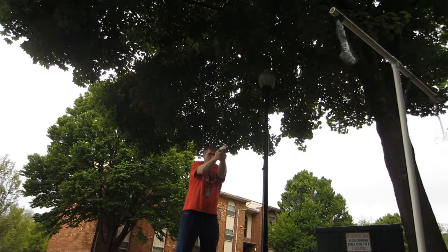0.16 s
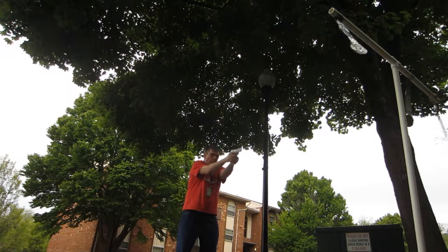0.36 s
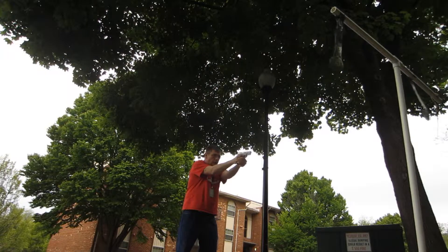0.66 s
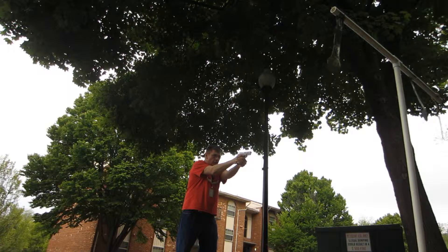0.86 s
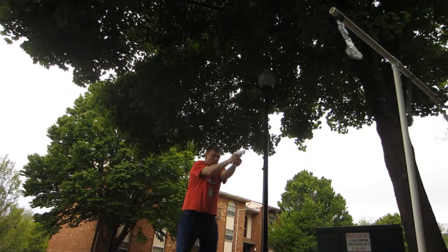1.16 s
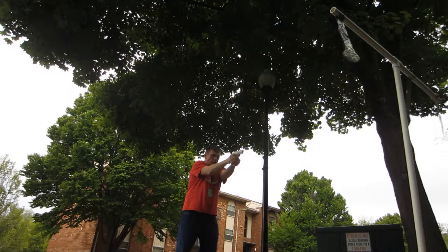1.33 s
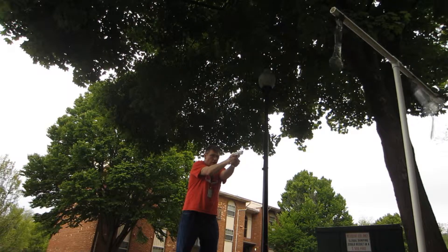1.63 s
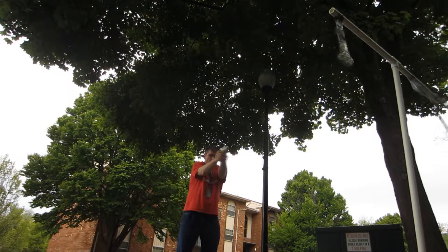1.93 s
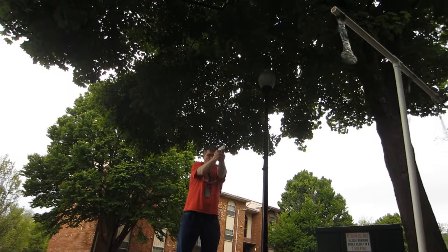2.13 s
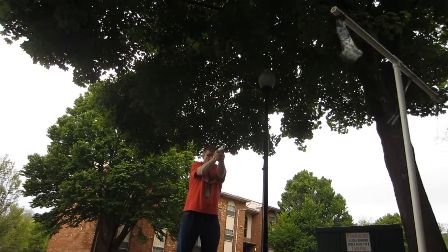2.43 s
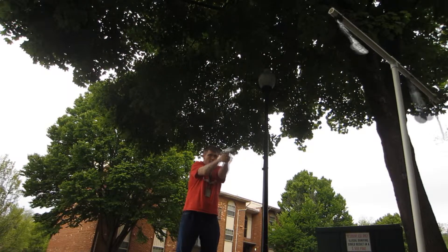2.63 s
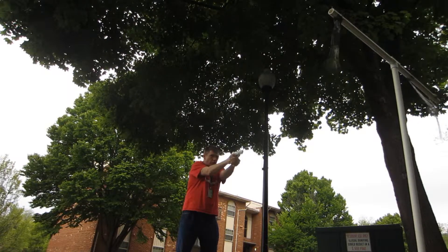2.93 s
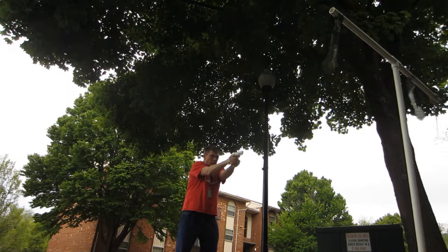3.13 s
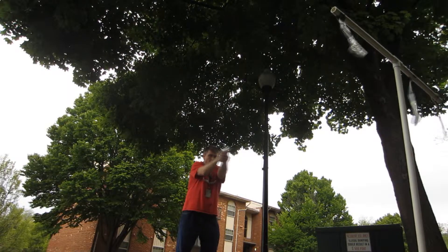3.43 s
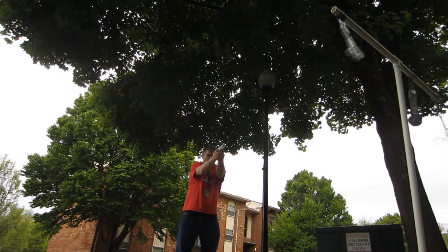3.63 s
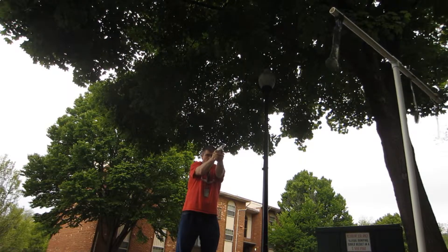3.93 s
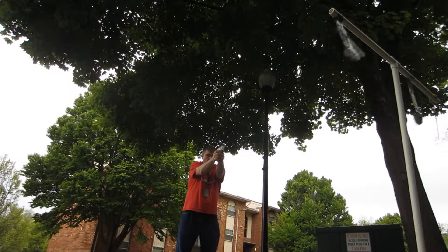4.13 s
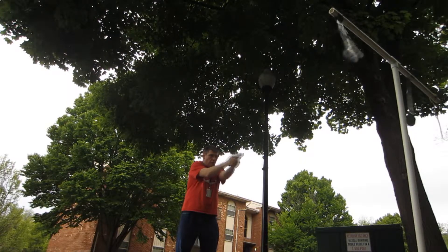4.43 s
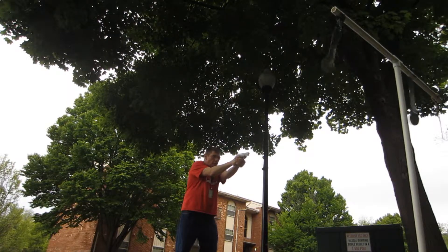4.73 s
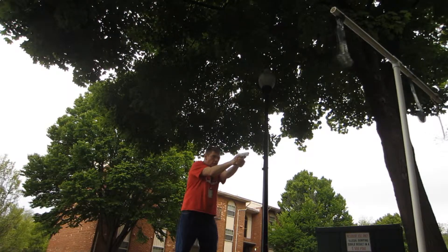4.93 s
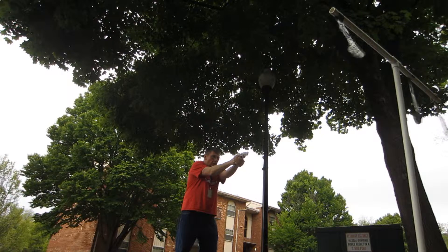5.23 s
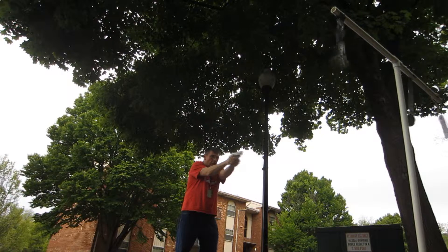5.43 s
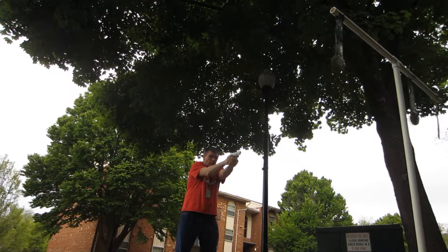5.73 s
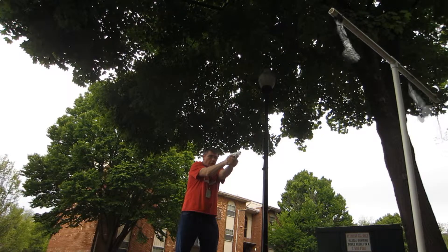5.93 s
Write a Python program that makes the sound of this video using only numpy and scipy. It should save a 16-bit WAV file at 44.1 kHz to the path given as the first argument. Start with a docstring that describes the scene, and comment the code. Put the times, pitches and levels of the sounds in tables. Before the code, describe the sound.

Close, dry, slightly clipped shots and metal hits, nearly a double snap each time, come roughly once a second. Plates ring briefly in differing pitches; the second and seventh hits rattle chain links more softly. Spent pellets click nearby, one rattling hard after the seventh shot. Distant tyre rush continues quietly, with a faint engine drone and hoarse bird chirps near the end. Trees and house fronts return a light echo.

```python
"""In a yard between houses a gas pistol is fired eight times at small metal targets near the microphone.
Each muzzle pop is a few short decaying tones and noise that arrive by several paths, then the pellet hits:
a crack and ringing metal, and on the chain clattering links. Spent pellets tick and rattle as short clicks.
Noise and an engine's tones make the traffic, and a bird chirps far off with falling tones. The yard echoes.
The recorder turns its gain down after each bang and clips the hardest hits."""
import sys
import numpy as np
from scipy import signal
from scipy.io import wavfile
from scipy.ndimage import uniform_filter1d, map_coordinates

SR = 44100
rng = np.random.default_rng(int(sys.argv[2]) if len(sys.argv) > 2 else 0)


def transcribe(signal):
    """Save signal, clipped to [-1, 1], as a 16-bit WAV file at the path in sys.argv[1]."""
    frames = np.atleast_2d(signal).T
    limited = np.clip(frames, -1, 1)
    pcm = np.round(limited * 32767).astype(np.int16)
    wavfile.write(sys.argv[1], SR, pcm)


N = 268128

# ways in which the chain can ring: (pitch_hz, level_db, t60_s)
CHAIN_MODES = [(1620, -19.5, 0.75), (2720, -20, .4), (3138.5, -6.5, 0.59), (3426, -18, .4),
               (3865, -15, 0.64), (4210, -14, 0.96), (4285, -6.5, .3), (4993, -2, 0.24), (5540, -8.5, 0.54),
               (5650, -6.5, .3), (6325, -9.5, 0.54), (7040, -9.5, .6), (7270, -7.5, 0.31),
               (7720, -12.5, 0.3), (7890, -17.5, .35), (8570, -12.5, 0.43), (8780, -11, 0.37),
               (9350, -4, 0.27), (9470, -9.5, .25), (9730, -10.5, 0.2), (10345, -24, .2),
               (11150, -26, 0.089), (13480, -25, 0.2), (13800, -11, 0.218), (14860, -15, 0.2),
               (15300, -11, .2)]
# a swinging target rubs its hook and damps fast, a fainter part lingers: (share of t60, lingering_db)
PLATE_DAMPING, CHAIN_DAMPING = (0.4, -13.5), (0.18, -13)


def amp(db):
    """Turn decibels into a gain."""
    return 10 ** (np.asarray(db) / 20)


def rms_one(x):
    """Scale to an rms (average strength) of 1."""
    return x / np.sqrt(np.mean(x ** 2) + 1e-30)


def at_hz(points, hz, column=1):
    """Read a table between its rows, on a log-frequency axis."""
    table = np.array(points)
    return np.interp(np.log(hz), np.log(table[:, 0]), table[:, column])


def pan(x, db):
    """Give a sound a left-right level difference; above 0 dB the left is louder."""
    return x * amp([[db / 2], [-db / 2]])


def add(out, sound, s):
    """Mix a stereo sound in at s seconds."""
    i = round(s * SR)
    out[:, i:i + sound.shape[1]] += sound[:, :N - i]


def dying(length, t60):
    """Exponential decay that falls by 60 dB in t60 seconds."""
    return np.exp(-np.log(1000) * np.arange(round(length * SR)) / SR / t60)


def ringing(modes, gains_db, length):
    """A struck thing sounds as a sum of decaying sines."""
    t = np.arange(round(length * SR)) / SR
    return sum(amp(db + gain_db) * dying(length, t60) * np.sin(2 * np.pi * hz * t)
               for (hz, db, t60), gain_db in zip(modes, gains_db))


def favour(modes, *pitches):
    """Extra dB for the modes near the favoured pitches, given as Hz and dB in turn."""
    mode_hz = np.array(modes)[:, 0]
    return sum(db * np.exp(-(np.log2(mode_hz / hz) / 0.12) ** 2)
               for hz, db in zip(pitches[::2], pitches[1::2]))


def bands(size):
    """Half-octave bands of mid and side noise with their centres in Hz."""
    edges_hz = 22 * 2 ** np.arange(0, 10, .5)
    white = rng.standard_normal((2, 2, size))
    for k, (low, high) in enumerate(zip(edges_hz, edges_hz[1:])):
        band = signal.butter(2, [low, high], "band", fs=SR, output="sos")
        yield np.sqrt(low * high), signal.sosfilt(band, white[k % 2])   # neighbours use different noise


def stereo(mid, side, alike):
    """Two channels of the given likeness: 0 is unrelated, 1 is the same."""
    alike = np.clip(alike, 0, 1)
    return np.sqrt(1 + alike) * mid + np.sqrt(1 - alike) * side * [[1], [-1]]


def drift(rate):
    """Slow random wander, with rate new values a second of spread 1."""
    knots = rng.standard_normal(400)
    return np.interp(np.arange(N) / SR * rate, np.arange(400), knots)


def flicker(size):
    """A turning target aims each mode now at the microphone, now past it: a gain that wavers at random."""
    spread_db, turns_per_s = 4, 35
    steps = np.arange(size) / SR * turns_per_s
    return amp(spread_db * np.interp(steps, np.arange(100), rng.standard_normal(100)))


def tyre_rush():
    """Far tyres make a patchy rush: noise bands that wander in level, together and each alone."""
    # colour of the rush: (band_hz, level_db per Hz)
    rush_colour = [(12, -55), (20, -29), (65, -4), (205, -7), (360, -8.5), (961, -11.5), (1780, -29),
                   (2490, -38), (5030, -43.5), (5470, -35), (5950, -49.5), (7660, -41.5), (12000, -68.5),
                   (15000, -53.5), (16400, -67)]
    # how alike left and right are: (band_hz, likeness 0 to 1)
    rush_likeness = [(60, 0.56), (180, 0.8), (550, 0.8), (1650, 0.71), (4970, 0.11), (15000, 0.083)]
    # loudness of the rush over time: (time_s, level_db)
    rush_level = [(0, -49), (1, -49), (2, -46), (3, -48), (4, -50), (4.8, -48.5), (5.4, -46.5),
                  (6.08, -47.5)]
    together = drift(3.6)
    rush = 0
    for hz, noise in bands(N):
        band_db = at_hz(rush_colour, hz) + 1.0 * together + 1.1 * drift(15)
        rush = rush + amp(band_db) * stereo(*noise, at_hz(rush_likeness, hz))
    level_db = np.interp(np.arange(N) / SR, *np.transpose(rush_level))
    return amp(level_db) * rms_one(rush)


def engine():
    """An engine draws near, then holds; its three related tones step up in pitch as it pulls."""
    near_s, near_db, approach_db_per_s = 5.2, -52, 12
    start_hz, pull_hz, pull_s = 200.4, 12, 0.284   # the step up ends at near_s
    t = np.arange(N) / SR
    hz = start_hz + pull_hz * np.clip((t - near_s) / pull_s + 1, 0, 1)
    level_db = near_db + approach_db_per_s * np.minimum(t - near_s, 0)
    turns = 2 * np.pi * np.cumsum(hz * (1 + 0.0088 * drift(28))) / SR
    drone = sum(amp(db + 3 * drift(15)) * np.sin(order * turns) for order, db in [(.5, -5), (1, 0), (1.5, -5)])
    return amp(level_db) * drone


def faint_hiss():
    """Band-filtered noise near 3 kHz swells with the bird's later calls and fades."""
    quiet_db, swell_s, rise_s, top_db, fade_db_per_s = -85.5, 5.04, 0.21, -59.5, 13.5
    t = np.arange(N) / SR
    level_db = quiet_db + (top_db - quiet_db) * np.clip((t - swell_s) / rise_s, 0, 1)
    level_db -= fade_db_per_s * np.maximum(t - swell_s - rise_s, 0)
    band = signal.butter(2, [2500, 3500], "band", fs=SR, output="sos")
    return amp(level_db) * rms_one(signal.sosfilt(band, rng.standard_normal(N)))


def traffic():
    """The rush of far tyres, the engine's drone and the faint hiss, a little to the right."""
    return pan(tyre_rush() + engine() + faint_hiss(), -.6)


def bird():
    """Short chirps: a sine that falls in pitch, made hoarse by random pitch jumps."""
    # calls of the far bird: (start_s, length_s, end_pitch_hz, level_db)
    chirps = [(0.908, 0.038, 2750, -82), (5.094, .05, 2650, -60), (5.183, 0.035, 3200, -65),
              (5.645, 0.05, 2570, -58), (5.789, 0.0544, 2580, -62.5), (5.957, 0.046, 2600, -58.5)]
    fall, roughness = 0.081, 0.28   # shares of the pitch
    out = np.zeros((2, N))
    for s, length, hz, db in chirps:
        u = np.linspace(-1, 1, round(length * SR))
        pitch = hz * (1 + fall * ((1 - u) / 2) ** 2 + roughness * rng.standard_normal(len(u)))
        chirp = (1 - u ** 2) * np.sin(2 * np.pi * np.cumsum(pitch) / SR)
        add(out, pan(amp(db) * chirp, 0), s)
    return out


def click():
    """A sharp contact gives a short broad burst of noise."""
    band = signal.butter(2, [1400, 9500], "band", fs=SR)
    burst = signal.lfilter(*band, stereo(*rng.standard_normal((2, SR // 10)), 0.22))
    return burst * dying(.1, 0.0039)


def ticks():
    """Spent pellets and the pistol's small parts: each a sharp click and a short ring, from here or there."""
    # single ticks: (start_s, level_db, pitch_hz, ring_t60_s)
    tick_list = [(0.386, -47, 4800, .004), (0.7448, -47.5, 4880, 0.0019), (1.2802, -32.5, 2070, 0.0031),
                 (1.58, -54.5, 2100, 0.011), (1.8764, -39, 2880, 0.0044), (2.2075, -59, 5050, .003),
                 (2.253, -54, 4080, 0.0047), (2.2605, -53.5, 5810, .01), (3.046, -53, 4690, .003),
                 (3.0574, -53, 6070, .003), (3.0889, -56.5, 5740, .02), (3.11, -49, 1960, 0.013),
                 (3.9296, -55.5, 4956, 0.0028), (4.883, -59, 5400, .06), (4.9397, -50, 1790, 0.0092)]
    pan_db, pan_spread_db = -1.5, 9
    out = np.zeros((2, N))
    for s, db, hz, t60 in tick_list:
        tick = amp(db - 6.0) * click() + ringing([(hz, db, t60)], [0], .1)
        add(out, pan(tick, pan_db + pan_spread_db * rng.standard_normal()), s)
    return out


def rebound():
    """A pellet rattles on something hard by the microphone: every touch clicks and rings the same short modes."""
    # touches of the pellet: (start_s, level_db)
    touches = [(5.4212, -22), (5.4227, -23), (5.4254, -6.5), (5.4362, -14), (5.4431, -24)]
    # ringing of the hard thing: (pitch_hz, level_db, t60_s)
    hard_modes = [(2300, -21.5, 0.024), (3500, -13.5, 0.0063), (5530, -10, 0.0064), (6460, -3, 0.0046),
                  (7440, -2, 0.0055)]
    out = np.zeros((2, N))
    for s, db in touches:
        ring = ringing(hard_modes, rng.normal(0, 3.4, len(hard_modes)), .1)
        add(out, pan(amp(db) * (amp(1.5) * click() + ring), -10.0), s)
    return signal.sosfilt(signal.butter(2, 9000, fs=SR, output="sos"), out + 1e-18)


def metal(modes, gains_db, share, linger_db, wavers=True):
    """Each mode has a strong, quickly damped part and a faint lingering pair that beats, uneven left to right."""
    split_hz, beat_hz, partner_db = 7.5, 6, -7.5
    out, t = np.zeros((2, SR)), np.arange(SR) / SR
    for (hz, db, t60), gain_db in zip(modes, gains_db):
        split, turn, lean, beat = rng.standard_normal(4)
        phase = 2 * np.pi * hz * t + 0.2 * turn * np.sqrt(hz / 5000) * np.array([[1], [-1]])
        partner = np.sin(phase + 2 * np.pi * beat_hz * (1 + .4 * beat) * t)
        linger = np.sin(phase) - amp(partner_db) * partner
        strong = np.sin(phase + 2 * np.pi * split_hz * split * t)
        both = dying(1, share * t60) * strong + amp(linger_db) * dying(1, t60) * linger
        waver = flicker(SR) if wavers else 1
        out += pan(amp(db + gain_db) * both * waver, 2.5 * lean)
    return out


def clatter():
    """Quick uneven link contacts click and push in step with each mode, so the ring swells while they last."""
    # spells of clatter: (start_s, end_s, level_db, pitch_hz, favour_db, second pitch_hz, favour_db)
    spells = [(1.03, 1.066, -44, 8100, 16, 6300, 3), (1.06, 1.101, -48, 3707, 20.4, 5050, 12),
              (5.26, 5.283, -38, 3140, 7.6, 4340, 11.4), (5.275, 5.312, -46, 5400, 4.7, 7000, 3.4)]
    contacts_per_s, click_db = 830, 13   # the clicks' level is over the clatter's
    out, t = np.zeros((2, N)), np.arange(SR // 10) / SR
    band = signal.butter(2, [2500, 10000], "band", fs=SR)
    for start, end, db, *pitches in spells:
        touch = (rng.random(len(t)) < contacts_per_s / SR) * (t < end - start)
        sound = 0
        for mode, gain_db in zip(CHAIN_MODES, db + favour(CHAIN_MODES, *pitches)):
            in_step = np.cos(2 * np.pi * (mode[0] * t + rng.random()))
            pushes = touch * rng.exponential(1, len(t)) * in_step
            one_ring = metal([mode], [gain_db], *CHAIN_DAMPING, wavers=False)
            ring = signal.fftconvolve([pushes], one_ring, axes=1)
            sound = sound + ring * flicker(ring.shape[1])
        add(out, pan(sound, -6.0), start)
        noise = stereo(*rng.standard_normal((2, SR // 20)), 1.0)
        link_click = signal.lfilter(*band, noise) * dying(.05, 0.02)
        clicks = signal.fftconvolve([touch * rng.standard_normal(len(t))], link_click, axes=1)
        add(out, pan(amp(db + click_db) * clicks, 0.54), start)
    return out


def hits():
    """A pellet's hit: a sharp crack, the target's modes and a shimmer of modes too dense to tell apart."""
    # pellet hits: (start_s, target, crack_db, ring_db, shimmer_db, shimmer_tilt_db per octave,
    # then two pitches favoured by the spot that is hit: pitch_hz, favour_db, pitch_hz, favour_db)
    hit_list = [(0.1604, "left", 5, -21.5, -24, -0.62, 2937, 9, 4430, 4),
                (1.029, "chain", -20, -28.5, -20.5, .3, 5040, 2.5, 8500, 3),
                (1.6795, "right", 2.5, -21.5, -20.5, -0.54, 1500, 12.5, 6120, 5),
                (2.501, "left", -0.5, -20, -18.5, 0.38, 2090, 5.5, 3007, 6.3),
                (3.192, "right", 4, -28, -30, 1.6, 1732, 11.5, 6070, 7.3),
                (4.111, "left", 1, -21, -19, -0.77, 3410, 13, 5890, 1.9),
                (5.2497, "chain", -12, -30.5, -20.5, -0.7, 4200, 4, 9550, 3.05),
                (6.0555, "right", -0.5, -34, -27, 1.2, 4200, 8, 1500, 3)]
    # ways in which the two plates can ring: (pitch_hz, level_db, t60_s)
    left_plate = [(1670, -14, 0.2), (2090, -10, 0.38), (2237, -17.5, 0.2), (2970, -7.5, 0.15),
                  (3426, -11.5, 0.15), (3460, -10.5, 0.26), (4410, -9, 0.39), (4740, -13, 0.13),
                  (5300, -9.5, 0.27), (5740, -11.5, 0.21), (5938, -12, 0.45), (6480, -13.5, 0.21),
                  (6900, -11, 0.4), (8600, -16, 0.33), (9090, -14.5, .2), (9550, -9, .2)]
    right_plate = [(1490, -5, 0.17), (1730, -4, 0.22), (2660, -15.5, 0.25), (2914, -14, 0.73),
                   (3514, -13, 0.2), (4020, -11, 0.19), (4580, -14, .35), (5150, -12.5, 0.57),
                   (5206, -10, 0.086), (6060, -7.5, 0.5), (6560, -17.5, 0.26), (7190, -6, .22),
                   (8820, -15, 0.26), (9500, -17, .25)]
    # colour of the dense high modes: (band_hz, level_db per Hz)
    shimmer_colour = [(410, -47), (700, -14), (1350, -7.5), (1710, -6), (2800, -2.5), (3030, -2.5),
                      (3550, -9.5), (6570, -1.5), (9730, -23), (11800, -25.5), (16000, -13.5)]
    shimmer_t60_s, crack_t60_s, crack_hz = 0.2, 0.011, 4440
    out = np.zeros((2, N))
    # modes, damping and left-right place in dB
    targets = {"left": (left_plate, PLATE_DAMPING, -3), "right": (right_plate, PLATE_DAMPING, -5.3),
               "chain": (CHAIN_MODES, CHAIN_DAMPING, -2)}
    for s, target, crack_db, ring_db, shimmer_db, tilt_db, *pitches in hit_list:
        modes, damping, pan_db = targets[target]
        scatter_db = rng.normal(0, 1.5, len(modes))
        ring = metal(modes, ring_db + favour(modes, *pitches) + scatter_db, *damping)
        # the plastic pellet flattens
        snap = -ringing([(crack_hz, crack_db, .0025), (8500, crack_db - 2.4, .002)], [0, 0], 1.)
        shimmer = 0
        for hz, noise in bands(SR):
            if hz > 600:
                band_db = at_hz(shimmer_colour, hz) + tilt_db * np.log2(hz / 4000)
                shimmer = shimmer + amp(band_db) * stereo(*noise, .9 - 0.046 * hz / 1000)
        # the same noise serves the long shimmer and the short crack
        shape = amp(shimmer_db) * dying(1, shimmer_t60_s) + amp(crack_db - 7.5) * dying(1, crack_t60_s)
        add(out, pan(snap - ring + rms_one(shimmer) * shape, pan_db), s)
    return out


def pistol():
    """One pop shape, nearly the same each time, by several paths; faint noise swells in just before each pop."""
    # muzzle pops: (start_s, level_db)
    shots = [ (0.1392, -1.5), (1.0066, -2), (1.6582, -0.5), (2.4789, -0.5), (3.1691, -3), (4.0893, -2),
             (5.2274, -2), (6.033, -2)]
    # ringing of barrel and slide: (pitch_hz, level_db, t60_s)
    pistol_modes = [(200, -16.5, 0.012), (300, -11, .015), (510, -13, 0.017), (740, -20, 0.034),
                    (1350, -18, 0.0051), (1666, -1.5, 0.0038), (2950, -7, 0.0047), (3683, -13, 0.0024),
                    (5060, -8, 0.0036), (6600, -16, 0.0019), (8540, -21.5, 0.0085), (14630, -19.5, .002)]
    # hammer fall, then the pop direct, by hands and ground twice, post, trunk and wall:
    # (delay_ms after the pop, level_db, dulling_hz)
    paths = [(-3.5, -13.5, 4000), (0.0, 5.5, 6800), (1.06, 0.5, 6000), (1.87, 2.5, 20000), (6, -17.5, 7700),
             (9.5, -8.5, 4000), (12, -21, 3700)]
    # the microphone points only its treble
    split_hz, bass_pan_db, treble_pan_db = 1100, -0.4, -3
    out = np.zeros((2, N))
    for s, level_db in shots:
        pop = -ringing(pistol_modes, rng.normal(0, 0.78, len(pistol_modes)), .05)
        pop += amp(-34.5) * rng.standard_normal(len(pop)) * dying(.05, 0.0035)
        t = np.arange(len(pop)) / SR
        pop *= np.minimum(t / 0.00022, 1)   # the valve takes a moment to open
        for ms, db, dull_hz in paths:
            dulled = signal.lfilter(*signal.butter(1, dull_hz, fs=SR), pop)
            bass = signal.lfilter(*signal.butter(1, split_hz, fs=SR), dulled)
            placed = pan(bass, bass_pan_db) + pan(dulled - bass, treble_pan_db)
            add(out, amp(level_db + db) * placed, s + (ms + 0.064 * rng.standard_normal()) / 1000)
        # a faint band of noise swells in just before the pop and fades slowly
        noise = stereo(*rng.standard_normal((2, len(pop))), .6)
        noise_band = signal.lfilter(*signal.butter(1, [1500, 7000], "band", fs=SR), noise)
        faint_noise = noise_band * dying(.05, .15) * np.minimum(t / .006, 1)
        add(out, pan(amp(level_db - 28) * faint_noise, -1.1), s - .006)
    return out


def yard(x):
    """Scatter from trees dies by band, near and far; house fronts return late echo clusters, most near 1900 Hz."""
    # scatter: (band_hz, near_level_db, near_t60_s, far_level_db, far_t60_s)
    scatter_table = [(297, -50.5, 0.26, -66.5, 0.63), (810, -45, 0.17, -65.5, 0.56),
                     (2000, -42, 0.13, -56.5, 0.8), (5140, -43.5, 0.24, -57, 0.65),
                     (10000, -42, 0.17, -57, 0.46), (15000, -49.5, 0.07, -67.5, 0.24)]
    # house fronts: (delay_s, spread_s, level_db)
    facades = [(0.166, 0.006, -59.5), (.2, 0.016, -66), (.25, 0.048, -78)]
    t = np.arange(SR) / SR
    late = sum(amp(db) * np.exp(-((t - s) / spread) ** 2) for s, spread, db in facades)
    answer = 0
    for hz, noise in bands(SR):
        near_db, near_t60, far_db, far_t60 = [at_hz(scatter_table, hz, column=k) for k in range(1, 5)]
        scatter = amp(near_db) * dying(1, near_t60) + amp(far_db) * dying(1, far_t60)
        scatter = scatter * np.minimum(t / 0.0059, 1)
        echoes = amp(-6 * np.log2(hz / 1900) ** 2) * late
        answer = answer + stereo(*noise, .6) * (scatter + echoes)
    return signal.fftconvolve(x.mean(0, keepdims=True), answer, axes=1)[:, :N]


def scene():
    """All sources; small things radiate little bass; the pops and hits excite the yard."""
    left_lag_s, bass_cut_hz = .000013, 320
    targets = hits() + clatter()
    # the targets hang to the right: their sound reaches the right port first
    targets[0] = map_coordinates(targets[0], [np.arange(N) - left_lag_s * SR], order=3)
    near = signal.sosfilt(signal.butter(2, bass_cut_hz, "high", fs=SR, output="sos"), pistol() + targets)
    return near + yard(near) + ticks() + rebound() + bird() + traffic()


def record(dry):
    """Gain control that sinks after loud sound and recovers slowly, clipping, steep top cut."""
    knee_db, slope, release_db_per_s, attack_s, top_cut_hz = -26, 0.37, 9, 0.02, 16800
    power = uniform_filter1d(np.mean(dry ** 2, 0), size=441)   # mean over 10 ms
    level_db = 10 * np.log10(power + 1e-12)
    # adding a ramp before the running maximum lets the cut recover at a steady pace
    ramp = release_db_per_s * np.arange(N) / SR
    cut_db = np.maximum.accumulate(slope * np.maximum(level_db - knee_db, 0) + ramp) - ramp
    r = np.exp(-1 / (attack_s * SR))
    ducked = dry * amp(-signal.lfilter([1 - r], [1, -r], cut_db))
    clipped = np.clip(ducked, -.9, .9)
    return signal.sosfilt(signal.cheby2(16, 60, top_cut_hz, fs=SR, output="sos"), clipped)


dry = scene()
out = record(dry)
transcribe(out)
```